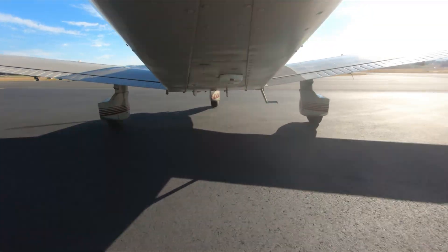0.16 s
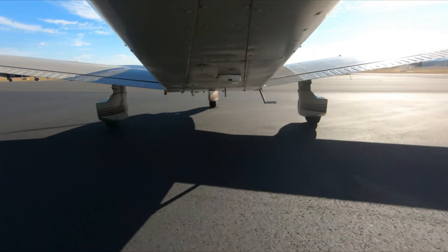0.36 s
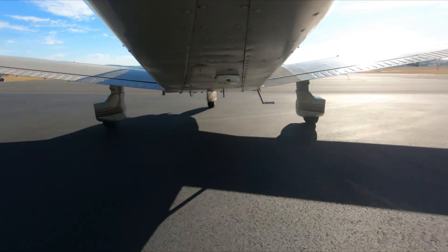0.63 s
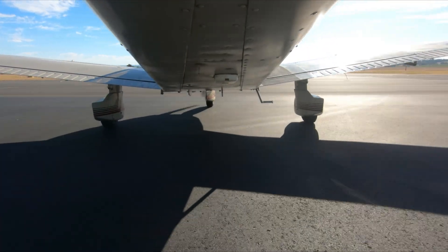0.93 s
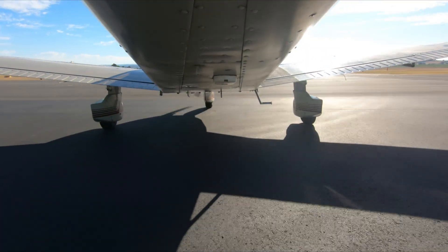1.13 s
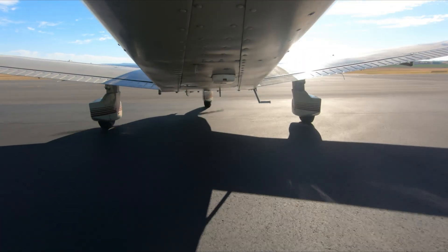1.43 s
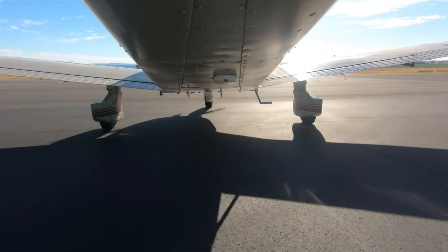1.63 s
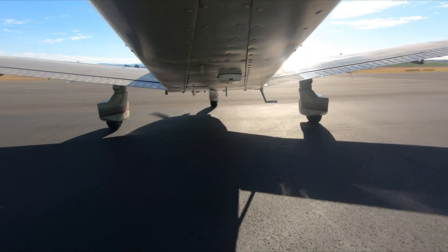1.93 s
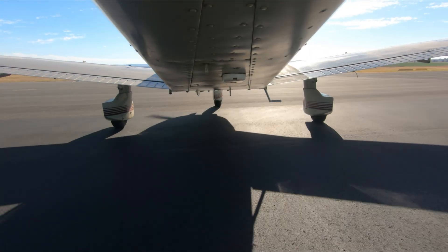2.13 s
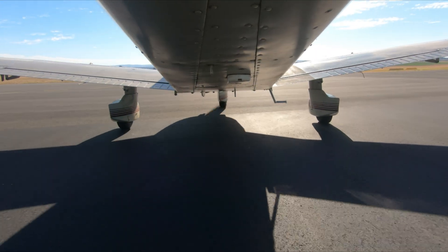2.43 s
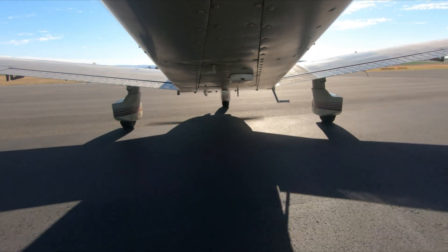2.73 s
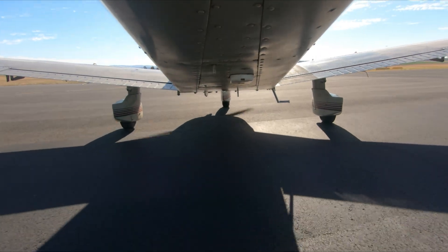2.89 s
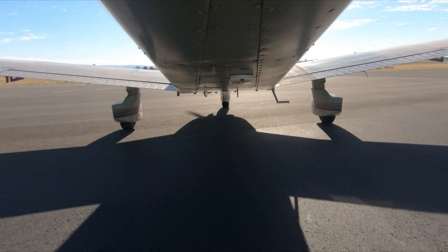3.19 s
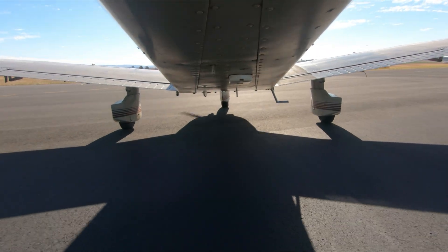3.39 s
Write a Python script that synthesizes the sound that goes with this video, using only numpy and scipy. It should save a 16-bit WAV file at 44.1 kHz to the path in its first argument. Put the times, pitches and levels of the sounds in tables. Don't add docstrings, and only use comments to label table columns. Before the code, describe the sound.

Small piston aircraft engine and propeller droning steadily at low taxi power, heard close under the tail.

```python
import sys
import numpy as np
from scipy import signal
from scipy.io import wavfile
from scipy.ndimage import uniform_filter1d

SR = 44100
rng = np.random.default_rng(int(sys.argv[2]) if len(sys.argv) > 2 else 0)


def invert_db(x):
    u = np.asarray(x, float) / 20
    return 10 ** u


def unload_wav(signal):
    wavfile.write(
        sys.argv[1],
        SR,
        np.round(np.clip(np.atleast_2d(signal).T, -1, 1) * 32767).astype(np.int16),
    )


N = 156555

# time in seconds, crank speed in rpm, blade and firing thump in dB.
ENGINE = [(0.0, 1653.4, -35.6), (0.3, 1652.7, -35.6), (0.59, 1655.2, -35.4), (0.89, 1651.4, -35.5),
          (1.18, 1657.5, -36.0), (1.48, 1658.3, -36.3), (1.78, 1662.4, -36.2), (2.07, 1656.3, -36.4),
          (2.37, 1657.0, -36.1), (2.66, 1655.7, -37.5), (2.96, 1649.0, -38.2), (3.25, 1656.5, -39.6),
          (3.55, 1658.7, -40.5)]
# the four cylinders in firing order, in dB.
CYLINDER_PUFFS = [
    (-0.52, 3.5, 4, 1),
    (0.26, -2.4, 0, -1.7),
    (.8, 1, -1, -0.4),
]


def evened(x):
    return x / np.sqrt(np.mean(x ** 2) + 1e-20)


def read(points, hz):
    f, value = np.transpose(points)
    return np.interp(np.log(hz + 1), np.log(f + 1), value)


def slow(rate_hz):
    f = np.geomspace(.3, rate_hz, num=16)[:, None]
    t = np.arange(0, N + 512, 512)
    waves = np.sin(2 * np.pi * (f * t / SR + rng.random(f.shape))) / np.sqrt(f)
    return np.interp(np.arange(N), t, evened(waves.sum(0)))


def noise(gain, patchy_db):
    # frequency in Hz, likeness of the two ports from 0 to 1.
    likeness = [(60, 1.0), (130, 0.96), (290, 0.95), (640, 0.93), (1410, 0.94), (3100, 0.7), (6820, 0.84),
                (15000, 0.6)]
    # frequency in Hz, left over right in dB.
    port_tilt = [(60, 0.6), (130, 2), (290, 2), (640, 3), (1410, 1.5), (3100, 2), (6820, 3.5),
                 (15000, -6.5)]
    # frequency in Hz, lead of the left port in radians.
    port_lead = [(100, 0.016), (1290, 0.097), (2150, 0.73), (2700, 0.55), (3800, 0.71), (5600, .02),
                 (12000, 0.16)]
    ripple_db = 1.4
    count, hz = N // 512 + 6, np.fft.rfftfreq(2048, 1 / SR)
    a, b, c, d, patches = rng.standard_normal((count, 1025, 5)).T
    patches = uniform_filter1d(patches, size=20, axis=0)
    patches = evened(uniform_filter1d(patches, size=3, axis=1))
    same = np.clip(read(likeness, hz), 0, 1)[:, None]
    left = a + 1j * b
    delayed = left * np.exp(-1j * read(port_lead, hz))[:, None]
    right = same * delayed + np.sqrt(1 - same ** 2) * (c + 1j * d)
    ripple = evened(uniform_filter1d(rng.standard_normal((1025, 1)), size=4, axis=0))
    tilt = invert_db(read(port_tilt, hz) / 2)[:, None]
    shape = gain(hz)[:, None] * invert_db(patchy_db * patches + ripple_db * ripple)
    spectrum = np.array([left * tilt, right / tilt]) * shape
    return evened(signal.istft(spectrum, nperseg=2048, noverlap=1536)[1][:, 1024:N + 1024])


def firings():
    start_turns, front_lead = -.224, .28
    t, rpm, _ = np.transpose(ENGINE)
    turns = np.cumsum(np.interp(np.arange(N) / SR, t, rpm)) / 60 / SR
    return 2 * (turns + start_turns) + front_lead + 4


def puffs(fired, luck, pattern_db, floor, rise, fall):
    spread_db = 1.25
    power = np.full(N, floor ** 2)
    for back in range(3):
        n = np.floor(fired + rise).astype(int) - back
        u = fired + rise - n
        size = invert_db(np.take(pattern_db, n % 4) + spread_db * luck[n])
        swell = np.sin(np.pi / 2 * np.minimum(u / rise, 1)) ** 2
        power += (size * swell * np.exp(-u / fall)) ** 2
    return evened(np.sqrt(power))


def drone(fired, luck):
    # multiple of the two-turn cycle, level in dB.
    orders = [(1, -35), (2, -11.5), (3, -37), (4, 0), (5, -16.5), (6, -13), (7, -14.5), (8, -7), (9, -21),
              (10, -21.5), (11, -15), (12, -28), (14, -20.5), (15, -23), (16, -16), (17, -40), (19, -24.5),
              (20, -18.5), (21, -34), (22, -21.5), (24, -24.5), (26, -26), (28, -29.5), (29, -26),
              (32, -28.5), (36, -33), (51, -22.5)]
    reversed_orders = (6, 12, 14, 28)
    # time in seconds, lift in dB.
    load = [
        (0, -3),
        (.5, -1.5),
        (1.1, -3),
        (1.6, 1),
        (2.1, 0.5),
        (2.5, -3),
        (3., 0.4),
        (3.55, -2),
    ]
    drone_db, stray_db, uneven_db, wander_db = -36, -7.5, 2.7, 1.62
    front_rad, shaft_lead_rad = -1.75, 0.97
    jitter = .014
    t, _, thump_db = np.transpose(ENGINE)
    coarse = fired[::8]
    coarse_s = np.arange(0, N, 8) / SR
    out = np.zeros(len(coarse))
    luck_db = uneven_db * np.interp(coarse, np.arange(len(luck)), luck)
    for k, db in orders:
        stray = k % 4 > 0 and k not in (2, 6)
        blade = k == 4
        level_db = drone_db + db + stray_db * stray + wander_db * slow(7.7)[::8]
        level_db += (k > 12) * np.interp(coarse_s, *np.transpose(load))
        if blade:
            level_db = np.interp(coarse_s, t, thump_db)
        lead = front_rad + np.pi * (k in reversed_orders) + shaft_lead_rad * (k == 2)
        lead += 2 * np.pi * stray * rng.random()
        late = np.interp(coarse, np.arange(len(luck)), luck[::-1]) * jitter * (1 - blade)
        wave = np.cos(2 * np.pi * k * (coarse - late) / 4 + lead)
        out += invert_db(level_db + (0.5 - 0.5 * blade) * luck_db) * wave
    full = signal.resample_poly(out, up=8, down=1, window=("kaiser", 12), padtype="line")[:N]
    return np.sqrt(2) * full * invert_db([[.6], [-.6]])


def exhaust(fired, luck):
    # frequency in Hz, level in dB.
    pipe_shape = [(90, -66), (150, 3.5), (220, 1), (330, 4), (480, -2), (700, -7.5), (1200, -19.5),
                  (2500, -90)]
    # frequency in Hz, level in dB.
    roar_shape = [(200, -77), (500, -4.5), (950, 2), (1400, -1.5), (1950, -10), (2250, -18), (3000, -23.5),
                  (6000, -86)]
    # frequency in Hz, width in Hz, level in dB.
    panel_rings = [(916, 72, -59), (1055, 31, -60.5), (1500, 42, -63.5), (1873, 99, -67.5), (2704, 61, -81),
                   (3063, 200, -76), (3490, 75, -79.5), (3810, 270, -77), (4010, 170, -79),
                   (4520, 92, -77.5), (5620, 730, -78.5), (7380, 310, -80), (11000, 91, -96),
                   (12000, 500, -89)]
    pipe_db, roar_db, split_hz = -50.5, -48, 950
    rise, fall = .46, .52

    def ring(hz):
        power = sum(invert_db(db) ** 2 / w / (1 + (2 * (hz - f) / w) ** 4) for f, w, db in panel_rings)
        return np.sqrt(power)

    pipe = invert_db(pipe_db) * noise(lambda hz: invert_db(read(pipe_shape, hz)), 1.5)
    roar = invert_db(roar_db) * noise(lambda hz: invert_db(read(roar_shape, hz)), 0.37)
    panels = np.linalg.norm(invert_db(np.transpose(panel_rings)[2])) * noise(ring, 1.9)
    low = signal.sosfiltfilt(signal.butter(3, split_hz, fs=SR, output="sos"), roar + panels)
    high = roar + panels - low
    return (pipe * puffs(fired, luck[::-1], CYLINDER_PUFFS[0], 0.99, 0.35, 0.4)
            + low * puffs(fired, luck[100:], CYLINDER_PUFFS[1], .75, rise, fall)
            + high * puffs(fired, luck, CYLINDER_PUFFS[1], .18, rise, fall))


def hiss(fired, luck):
    # frequency in Hz, level in dB.
    hiss_shape = [(1350, -61), (2300, -3.5), (4000, -6.5), (8000, -11.5), (10000, -16), (12400, -27),
                  (13100, -27), (15700, -40)]
    hiss_db, tick_fall, tick_share = -63.5, 0.28, 0.45
    tick_luck = 2.3 * rng.standard_normal(999)
    ticks = puffs(2 * fired, tick_luck, (1.3, -1.7, 1.6, -0.55), 0.079, 0.31, 2 * tick_fall)
    own_luck = 0.24 * luck + 0.79 * rng.standard_normal(len(luck))
    puffed = puffs(fired, own_luck, CYLINDER_PUFFS[2], 0.49, 0.14, 0.69)
    gate = (1 - tick_share) * puffed ** 2 + tick_share * ticks ** 2 + 0.71
    return invert_db(hiss_db) * evened(np.sqrt(gate)) * noise(lambda hz: invert_db(read(hiss_shape, hz)), 1.0)


def wash():
    # frequency in Hz, level in dB.
    rumble_shape = [(8, -21), (26, 7.5), (42, -3), (70, -8), (100, -2), (135, -7), (185, -14.5), (900, -81)]
    rumble_db = -43
    return invert_db(rumble_db + 0.5 * slow(4.8)) * noise(lambda hz: invert_db(read(rumble_shape, hz)), 0.14)


def whine():
    # frequency in Hz, level in dB.
    gear_tones = [(2654, -77), (3779, -83), (5286, -92)]
    waver, flutter_db = .0007, 2.2
    seconds = np.cumsum(1 + waver * slow(60.)) / SR
    return sum(np.sqrt(2) * invert_db(db + flutter_db * slow(60.)) * np.sin(2 * np.pi * hz * seconds)
               for hz, db in gear_tones)


def supply():
    # frequency in Hz, level in dB.
    supply_tones = [(13265, -101), (14150, -100.5), (15035, -103.5)]
    sweep_hz, sweep = 18.8, .0048
    t = np.arange(N) / SR
    swing = np.tanh(2 * np.sin(2 * np.pi * sweep_hz * t + .6 * slow(9.)) + .5)
    seconds = np.cumsum(1 + sweep * swing) / SR
    return sum(np.sqrt(2) * invert_db(db + slow(30.)) * np.sin(2 * np.pi * hz * seconds)
               for hz, db in supply_tones)


def knocks(fired, luck):
    # firings into the cycle, pitch in Hz, time to fall 60 dB in seconds, level in dB.
    stack_knocks = [
        (.3, 610, .035, -63),
        (.35, 520, .04, -65),
        (.85, 370, .05, -64),
    ]
    rise_s, luck_db = 0.0018, 4
    out = np.zeros(N)
    for at, hz, t60, db in stack_knocks:
        cycle = (fired - at) / 4
        s = cycle % 1 / np.gradient(cycle).mean() / SR
        size_db = db + luck_db * luck[cycle.astype(int) + 300]
        shape = (1 - np.exp(-s / rise_s)) * invert_db(-60 * s / t60) * np.sin(2 * np.pi * hz * s)
        out += invert_db(size_db) * evened(shape)
    return out * invert_db([[1.1], [-1.1]])


def strobe():
    # start in seconds, level in dB.
    charges = [
        (1.32, -100),
        (2.78, -101),
    ]
    low_hz, top_hz, charge_s = 12900, 15200, .2
    out, u = np.zeros(N), np.arange(0, 1, 1 / SR / charge_s)
    hz = low_hz + (top_hz - low_hz) * u ** .7
    whistle = np.sin(np.pi * u) ** .5 * np.sin(2 * np.pi * np.cumsum(hz) / SR)
    for s, db in charges:
        out[round(s * SR):][:len(u)] += invert_db(db) * whistle
    return out


def scene():
    fired, luck = firings(), rng.standard_normal(499)
    engine = drone(fired, luck) + exhaust(fired, luck) + hiss(fired, luck)
    return engine + wash() + whine() + supply() + knocks(fired, luck) + strobe()


def low_pass(x):
    return signal.sosfilt(signal.butter(12, 15720, fs=SR, output="sos"), x)


def record(dry):
    settle_s, ceiling, offset = .004, .088, .0009
    settle = np.minimum(.25 + np.arange(N) / SR / settle_s, 1)
    mix = ceiling * np.tanh(invert_db(0.36) * settle * dry / ceiling) + offset
    return low_pass(mix)


dry = scene()
out = record(dry)
unload_wav(out)
```